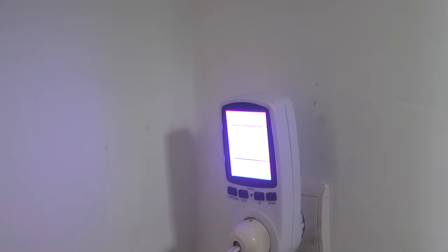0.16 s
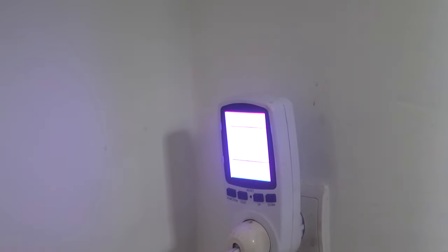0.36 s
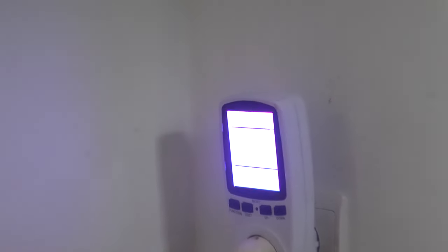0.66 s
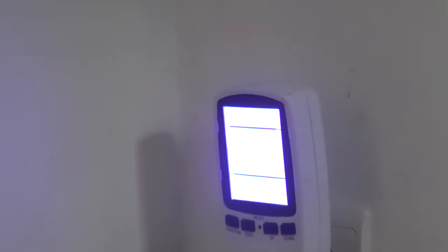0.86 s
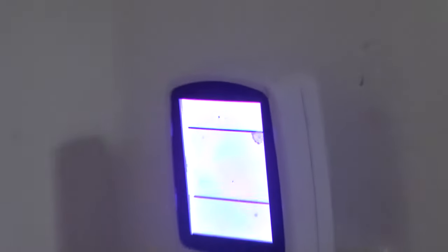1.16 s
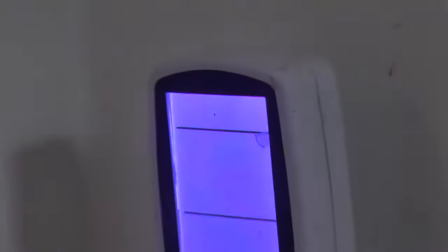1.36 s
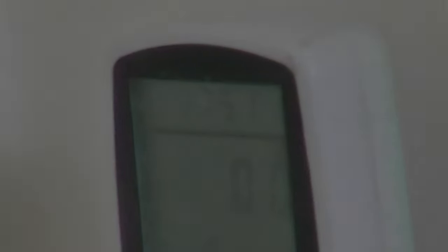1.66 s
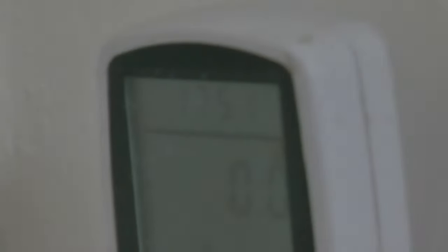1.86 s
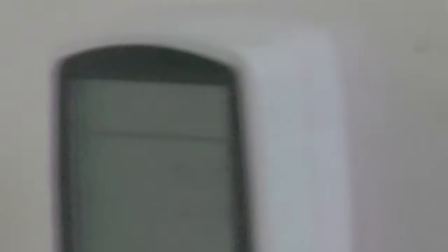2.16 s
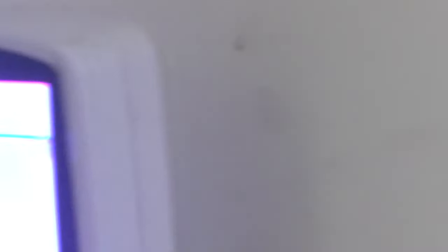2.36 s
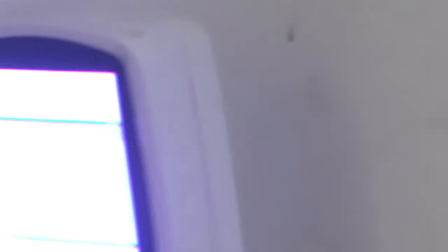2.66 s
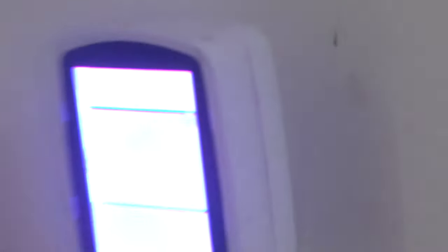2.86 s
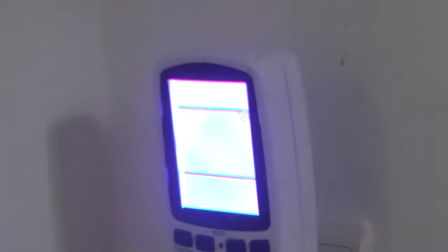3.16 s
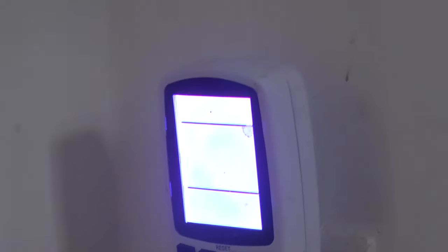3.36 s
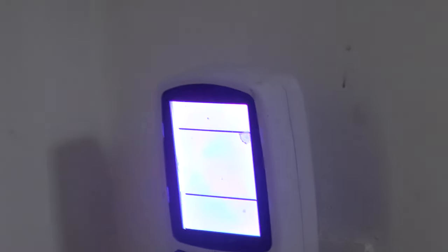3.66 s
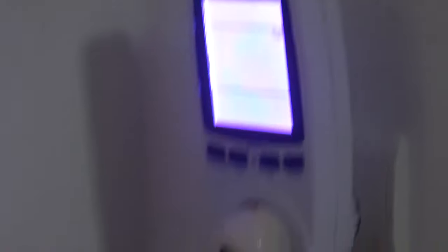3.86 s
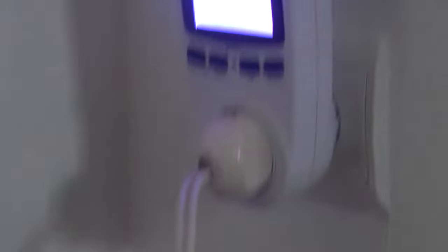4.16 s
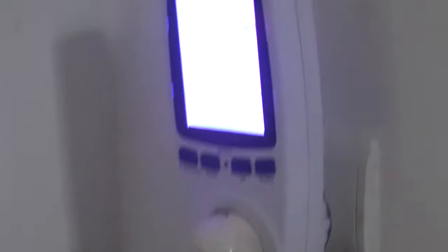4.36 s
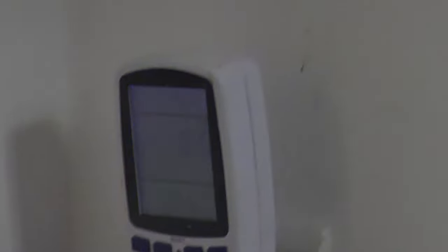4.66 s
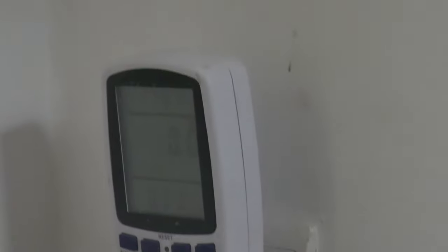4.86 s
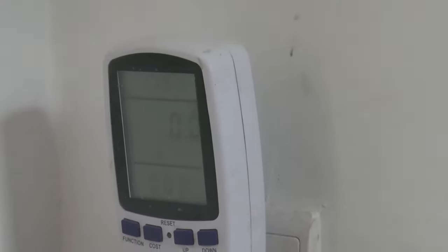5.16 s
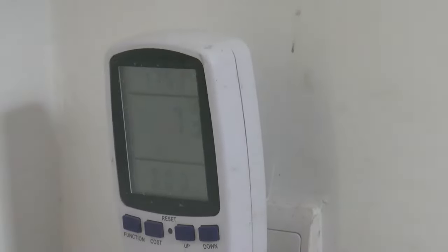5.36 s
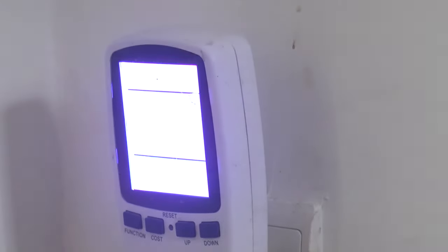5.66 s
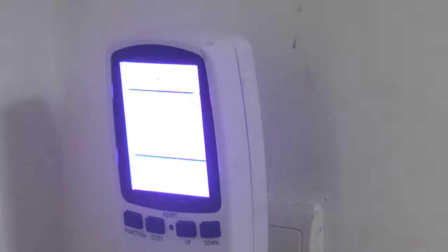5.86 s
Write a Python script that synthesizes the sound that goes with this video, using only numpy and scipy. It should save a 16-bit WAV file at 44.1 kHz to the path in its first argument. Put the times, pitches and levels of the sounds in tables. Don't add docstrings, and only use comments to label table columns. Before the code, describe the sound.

A quiet, steady fan drone fills a bare room from start to finish: a hollow case resonance around the middle pitches, a low hum under it, a slightly unsteady blade tone strongest at first, and soft hiss with a phasey, comb-like colour. Over it sits a thin high electric whine near 2 kHz and above, almost fixed in pitch. It is moderate at the start, weakens by 1.1 s, dips at 1.5, swells strongly from 1.8 to 2.25, nearly vanishes at 2.5, rises a little around 4, swells again at 4.9, dips at 5.2 and stays strong from 5.6 to the end. A soft bump opens; crisp plastic ticks fall at 0.35, 1.73 and 3.2 s. Dull handling thumps come at 3.35 and 3.7, then cluster heavily at 3.8-3.9 and 4.1, with a weaker one at 4.25 and a faint one at 5.0. The stereo image narrows from about 1.5 to 3 s.

```python
import sys
import numpy as np
from scipy import signal
from scipy.fft import rfft, irfft, next_fast_len
from scipy.io import wavfile
from scipy.ndimage import uniform_filter1d, map_coordinates

SR = 44100
rng = np.random.default_rng(int(sys.argv[2]) if len(sys.argv) > 2 else 0)


def natural_amplitude(level_db):
    exponent = np.asarray(level_db, float) / 20
    return 10 ** exponent


def wav_out(sig):
    wavfile.write(sys.argv[1], SR, np.round(np.clip(np.atleast_2d(sig).T, -1, 1) * 32767).astype(np.int16))


N = 264996

# time in seconds, pitch in Hz.
SPEED = [(0, 637.5), (1.5, 638.6), (1.85, 642), (2.2, 642), (2.6, 639.7), (4.55, 640.2), (5.3, 644.5),
         (5.7, 642), (6.01, 641.8)]
MIDDLING_DB = -43
ZOOM_IN_S, ZOOM_OUT_S, ZOOM_GLIDE_S = 1.58, 2.94, 1


def unit(x):
    return x / np.sqrt(np.mean(x ** 2) + 1e-20)


def along(points, hz):
    f, v = np.transpose(points)
    return np.interp(np.log(hz + 1), np.log(f + 1), v)


def curves(rows):
    s, *cols = np.transpose(rows)
    return [np.interp(np.arange(N) / SR, s, c) for c in cols]


def wobble(rate):
    knots = rng.standard_normal(int(N * rate / SR) + 4)
    return map_coordinates(knots, [np.arange(N) * rate / SR])


def filtered(x, response):
    m = next_fast_len(x.shape[-1] + 8192)
    spectrum = rfft(x, m) * response(np.fft.rfftfreq(m, 1 / SR))
    return irfft(spectrum, m)[..., :x.shape[-1]]


def resonance(f, hz, width_hz):
    return 1j * f * width_hz / (hz * hz - f * f + 1j * f * width_hz)


def glide(s):
    return np.clip((np.arange(N) / SR - s) / ZOOM_GLIDE_S + .5, 0, 1)


def zoomed():
    return glide(ZOOM_IN_S) - glide(ZOOM_OUT_S)


def stereo_width():
    return 2.5 + 3 * (1 - glide(ZOOM_IN_S)) - 8 * zoomed()


def combed(f):
    # frequency in Hz, share of the direct sound.
    late_share = [(800, 0.031), (1200, 0.32), (3000, 0.3), (8000, 1), (11000, 0.79), (15000, 0.17)]
    delay_s = 111.1 / 44100
    return 1 - np.clip(along(late_share, f), 0, 1) * np.exp(-2j * np.pi * f * delay_s)


def narrow_ripple(f):
    # centre in Hz, width in Hz, lift (dip if negative) in dB.
    lifts_and_dips = [(1745, 25, 5), (1885, 18, 6.5), (2030, 20, -5), (2070, 10, 7), (2280, 20, 7.5),
                      (2785, 61, -4), (2935, 45, 7.5), (3502, 70, 6.5), (3560, 52, -6), (4320, 44, -28)]
    return natural_amplitude(sum(db * abs(resonance(f, hz, w)) ** 2 for hz, w, db in lifts_and_dips))


def walls(f):
    late_s = rng.uniform(.006, .045, size=12)
    return 1 + sum(0.12 * np.exp(-2j * np.pi * f * s) for s in late_s)


def rush(colour, patchy_db, path=np.ones_like, width_db=0, open_db=-60):
    # frequency in Hz, side against mid in dB.
    side_share = [(60, 4), (120, -13.5), (300, -12), (700, -10.5), (1300, -10.5), (2400, -0.5), (3500, -12),
                  (4500, -13.5), (6000, -40), (7500, -14.5), (9000, -9), (11000, -12.5), (15000, 0.5)]
    z = signal.stft(rng.standard_normal((2, N)), nperseg=512)[2]
    field = uniform_filter1d(rng.standard_normal(z.shape[1:]), size=5, axis=0)
    field = uniform_filter1d(field, size=8, axis=1)
    pair = signal.istft(z * natural_amplitude(patchy_db * unit(field)), nperseg=512)[1][:, :N]

    def split(f):
        return colour(f) * [path(f), natural_amplitude(along(side_share, f)), natural_amplitude(open_db + 0 * f)]

    mid, side, direct = filtered(pair[[0, 1, 1]], split)
    direct = np.roll(direct, N // 2)
    return unit(mid + natural_amplitude(width_db) * (direct + side * [[1], [-1]]))


def load():
    # time in seconds, 3rd overtone in dB, 4th over 3rd in dB.
    load_swells = [(0, -38, -2), (1.1, -46, 3), (1.45, -44, 3), (1.53, -58, 10), (1.78, -39, -19),
                   (1.89, -33, -4.5), (2.23, -29.5, -5), (2.33, -45, -11), (2.5, -57.5, 6),
                   (3.8, -46.5, -4), (4.05, -37, 2), (4.62, -46, 5), (4.9, -33.5, -2.5),
                   (5.04, -35.5, -2.5), (5.16, -49.5, 11.5), (5.5, -45, 8.5), (5.62, -31.5, -6),
                   (6.01, -31, -10)]
    third, tilt = curves(load_swells)
    return third - MIDDLING_DB, third + tilt - MIDDLING_DB


def fan():
    # centre in Hz, width in Hz, level in dB.
    case_rings = [(546.5, 12, -4), (642, 25, -8.5), (678, 45, -5), (722, 24.5, 0.5), (751, 47, -4)]
    # frequency in Hz, gain in dB.
    case_edge = [(400, -41), (500, -3.5), (560, 0), (805, -0.5), (835, -24), (1000, -5)]
    # frequency in Hz, density in dB per Hz.
    hum_colour = [(60, -50), (110, -35), (146, -11), (177, -17.5), (243, -8), (294, -9), (345, 3),
                  (383, -11), (412, -9), (450, -16.5), (495, -21), (560, -24), (700, -60)]
    # frequency in Hz, density in dB per Hz.
    hiss_colour = [(490, -28), (830, -5.5), (861, -13.5), (1040, -7), (1250, -22.5), (1450, -8),
                   (1620, -15.5), (1850, -12), (2090, -12.5), (2610, -11.5), (2740, -15.5), (3380, -8),
                   (4280, -15), (9180, -22), (15800, -47)]
    # time in seconds, blade tone in dB.
    facing = [(0, -41.5), (1.45, -43.5), (1.8, -56), (2.3, -58.5), (2.5, -51), (3.4, -47.5), (4.1, -54),
              (4.7, -58.5), (4.95, -50), (5.5, -48), (6.01, -59)]

    blade_db, = curves(facing)
    turned = blade_db - blade_db.mean()
    case_db = -42 + 0.18 * turned
    hum_db = -45.3 + zoomed() + 0.14 * turned - 0.6 * np.arange(N) / SR
    hiss_db = -45.5 + 0.028 * load()[0] + 1.4 * zoomed()

    def ring(f):
        power = sum(abs(natural_amplitude(db) * resonance(f, hz, w)) ** 2 for hz, w, db in case_rings)
        return natural_amplitude(along(case_edge, f)) * np.sqrt(power)

    case = natural_amplitude(case_db + 2.1 * wobble(45)) * rush(ring, patchy_db=1.0)
    hum = natural_amplitude(hum_db) * rush(lambda f: natural_amplitude(along(hum_colour, f)), patchy_db=2.5)
    hiss = natural_amplitude(hiss_db) * rush(lambda f: natural_amplitude(along(hiss_colour, f)), patchy_db=1.6,
                               path=lambda f: narrow_ripple(f) * walls(f) * combed(f),
                               width_db=stereo_width(), open_db=-10.0)
    blade_hz = 5 / 4 * curves(SPEED)[0]
    turn = 2 * np.pi * np.cumsum(blade_hz + 2.1 * wobble(12)) / SR
    blade_gain = np.sqrt(2) * natural_amplitude(blade_db + 1.2 * wobble(10)) * natural_amplitude([[-1.1], [1.1]])
    blade = blade_gain * np.sin(turn + [[.1], [-.1]])
    return natural_amplitude([[-.4], [.4]]) * (case + natural_amplitude([[-.6], [.6]]) * hum + blade) + hiss


def sway():
    # start in seconds, level in dB.
    jolts = [
        (0.0, -50),
        (3.4, -68),
        (3.86, -51),
        (4.2, -56),
    ]
    rise_s, t60_s, still_db = 0.018, 1.13, -77.5
    since = np.maximum(np.arange(N) / SR - np.array(jolts)[:, :1], 0)
    swell = natural_amplitude(np.array(jolts)[:, 1:] - 60 * since / t60_s) * (1 - np.exp(-since / rise_s))
    rumble = rush(lambda f: resonance(f, 97, 55) ** 2 / (1 + (f / 130) ** 6), patchy_db=2.0)
    return (natural_amplitude(still_db) + swell.sum(axis=0)) * rumble


def bumps():
    # start in seconds, level in dB, rise in seconds,
    # 60 dB decay in seconds, centre in Hz.
    hand_bumps = [(0.013, -29, 0.0058, 0.06, 85), (.365, -38.5, 0.0015, .08, 208),
                  (2.515, -41, 0.0091, .09, 284.4), (3.338, -27, 0.0034, .12, 332.6),
                  (3.695, -33, 0.0045, 0.1, 137), (3.808, -24, 0.0091, 0.091, 246),
                  (3.824, -21.5, 0.0032, 0.091, 323), (3.887, -31, 0.0088, 0.14, 220),
                  (3.914, -24.5, 0.017, 0.098, 200), (4.107, -20.5, 0.0039, 0.079, 389),
                  (4.122, -20.5, 0.0057, 0.079, 291), (4.255, -31, 0.012, 0.17, 299),
                  (4.97, -48, 0.0084, 0.13, 90), (5.012, -35.5, 0.0069, 0.09, 300)]
    out, t = np.zeros((2, N + 8192)), np.arange(8192) / SR
    push_hz = 85
    push = np.sin(2 * np.pi * push_hz * t)
    push_side = 0.18 * np.gradient(push) * SR / (2 * np.pi * push_hz)
    for s, db, rise, t60, hz in hand_bumps:
        shape = (1 - np.exp(-(t / rise) ** 2)) * natural_amplitude(-60 * np.maximum(t - rise, 0) / t60)
        body = lambda f: resonance(f, hz, 1.9 * hz) * resonance(f, 160, 610) / (1 + (f / 520) ** 10)
        rumble, side = unit(filtered(rng.standard_normal((2, len(t))), body))
        swing = np.sin(2 * np.pi * hz * 1.15 * np.cumsum(np.exp(-t / 0.149)) / SR)
        mid = 0.87 * swing + 0.74 * rumble + 0.29 * push
        bump = mid + (0.32 * side + push_side) * [[1], [-1]]
        out[:, round(s * SR):][:, :len(t)] += natural_amplitude(db + 2) * shape * bump
    bass_cut = lambda f: (1j * f / (65 + 1j * f)) ** 2
    return filtered(out, bass_cut)[:, :N]


def ticks():
    # start in seconds, peak in dB, brightness in octaves over # the second mode
    # of the dull shell, low body in dB.
    shell_ticks = [(.33, -38, .3, -39), (.365, -20.5, 0.26, -37), (1.7309, -18, .12, -36),
                   (1.7313, -27, 1.25, -30), (3.2042, -25.5, 0.37, -48), (3.206, -34, 1.18, -33.5),
                   (3.35, -55, .4, -40.5), (3.3652, -40.5, 1.7, -60), (3.535, -49, 1.25, -60),
                   (3.831, -48, .9, -35.5), (4.125, -36, .3, -41), (4.28, -52, .9, -41)]
    # centre in Hz, width in Hz, level in dB.
    tick_modes = [
        [(3350, 400, -6.5), (3770, 580, 3)],
        [(4900, 490, 2.5), (5730, 400, -7.5)],
        [(7800, 610, -17), (9100, 1030, 3.5)],
        [(11500, 1100, 9.5), (14300, 3350, 4)],
        [(597, 1200, 9), (1070, 390, -5), (1378, 150, -2), (1750, 320, 2), (2700, 900, 1)],
    ]
    out, t = np.zeros((2, N + 2048)), np.arange(2048) / SR
    lowest_hz = tick_modes[0][1][0]
    octaves = np.log2([modes[1][0] / lowest_hz for modes in tick_modes[:-1]])
    for s, peak_db, bright, low_db in shell_ticks:
        groups = [*(peak_db - 18 * abs(octaves - bright)), low_db]
        snap = 0.06 * rng.standard_normal((2, len(t))) * natural_amplitude(-60 * t / 0.011)
        snap[:, 0] += [1.1, .9]
        body = lambda f: sum(natural_amplitude(g + db) * SR / w * resonance(f, hz, w) ** 2
                             for g, modes in zip(groups, tick_modes) for hz, w, db in modes)
        out[:, round(s * SR):][:, :len(t)] += natural_amplitude(-7.5) * filtered(snap, body)
    out = out[:, :N]
    airborne = np.clip(0.34 + 0.79 * glide(ZOOM_IN_S), 0, 1)
    return (1 - airborne) * out + airborne * filtered(out, combed)


def motor():
    # level in dB at middling load, growth with the 3rd in dB per dB,
    # growth with the 4th in dB per dB, lift when zoomed in in dB.
    weak_overtones = [(-68, .35, .35, 8.5), (-56.5, -0.019, 0.46, -2), (-63, -0.17, .1, -1.5)]
    # time in seconds, left over right of the 3rd overtone in dB.
    aim = [(0, 4), (1.3, 6.5), (1.65, 1.7), (2.3, -1.3), (2.7, -11.5), (3.3, -9.5), (3.8, -2), (4.85, -1.4),
           (5.25, 4.5), (5.65, 0.3), (6.01, .4)]
    # frequency in Hz, density in dB per Hz.
    rasp_colour = [(1500, -42), (1680, -5.5), (1900, -2.5), (2200, -5.5), (2700, -7), (3500, -8.5),
                   (4000, -27.5), (6000, -12), (8000, -35)]

    (hz,), (lean_db,), (third, fourth) = curves(SPEED), curves(aim), load()
    levels = [MIDDLING_DB + third, MIDDLING_DB + fourth]
    levels += [db + a * third + b * fourth + c * zoomed() for db, a, b, c in weak_overtones]
    hz = uniform_filter1d(hz, size=SR // 5)
    turn = 2 * np.pi * np.cumsum(hz * (1 + 0.000766 * wobble(40))) / SR

    lead3, lead4 = 0.13 * lean_db, -0.057 * abs(lean_db)
    leads = [lead3, lead4, 0, 0.78 * lead4, 0.37 * lead4]
    leans = [lean_db, 0, 0, 0, 0]
    flicker = [0.17, 0.13, 0.22, 0.29, 0.099]
    half = np.array([[.5], [-.5]])
    tones = 0
    for k, (db, lean, lead, rough) in enumerate(zip(levels, leans, leads, flicker)):
        size = np.sqrt(2) * natural_amplitude(db + (0.26 + 0.63 * k) * wobble(25) + lean * half)
        size = size * (1 + rough * wobble(220))
        tones = tones + size * np.sin((k + 3) * turn + k * k + lead * half)

    rasp = rush(lambda f: natural_amplitude(along(rasp_colour, f)), patchy_db=1.4,
                path=lambda f: narrow_ripple(f) * combed(f), width_db=-25)
    return tones + natural_amplitude(-48 + 0.38 * third + 4 * zoomed()) * rasp


def scene():
    return fan() + sway() + bumps() + ticks() + motor()


def top_cut(x):
    return signal.sosfilt(signal.butter(12, 15940, fs=SR, output="sos"), x)


def record(dry):
    mix = filtered(dry, lambda f: f < 15760)
    return top_cut(mix)


dry = scene()
out = record(dry)
wav_out(out)
```